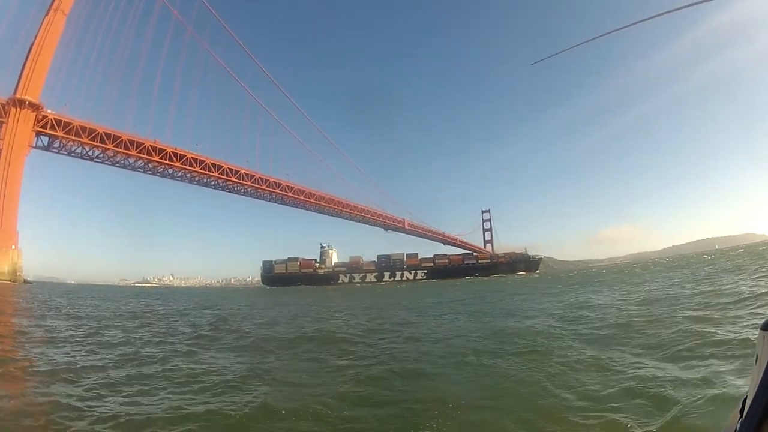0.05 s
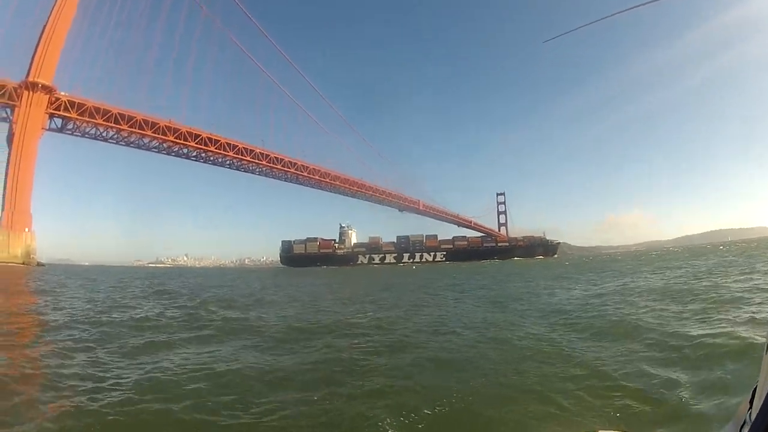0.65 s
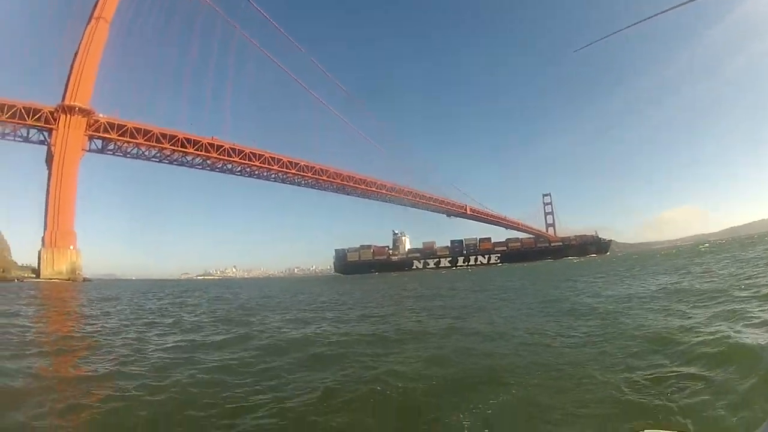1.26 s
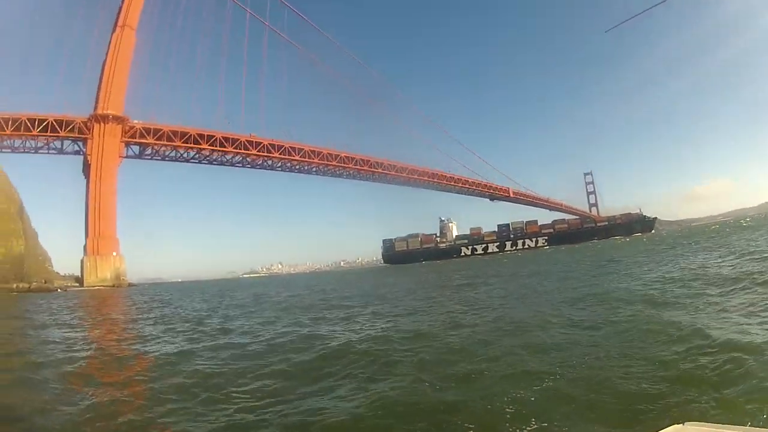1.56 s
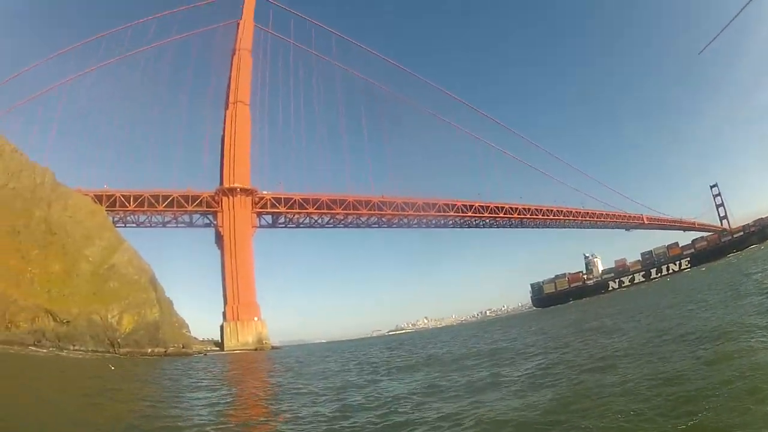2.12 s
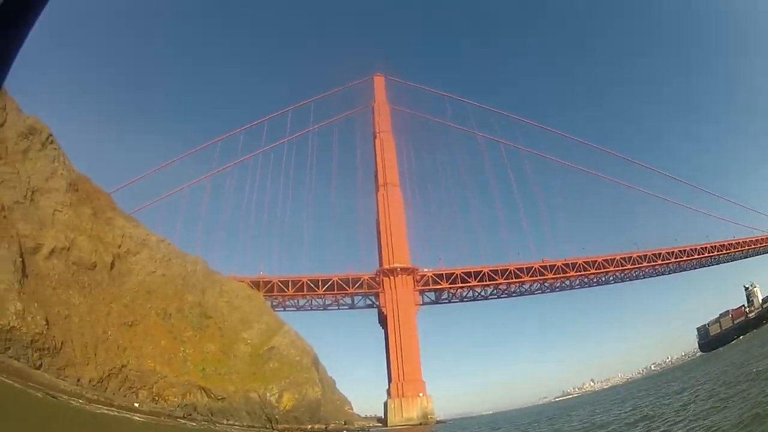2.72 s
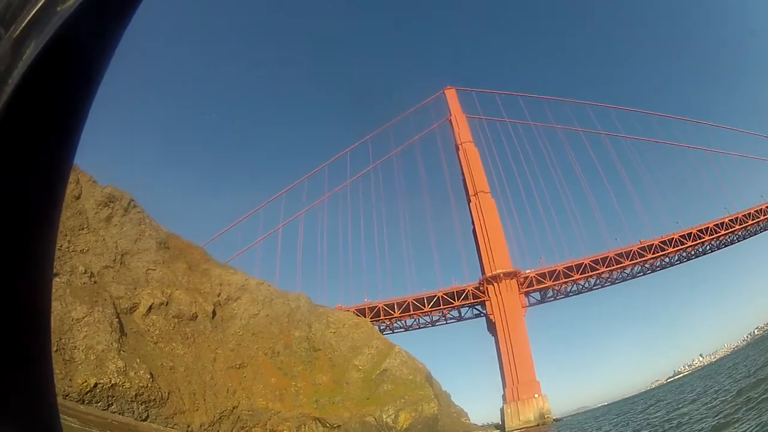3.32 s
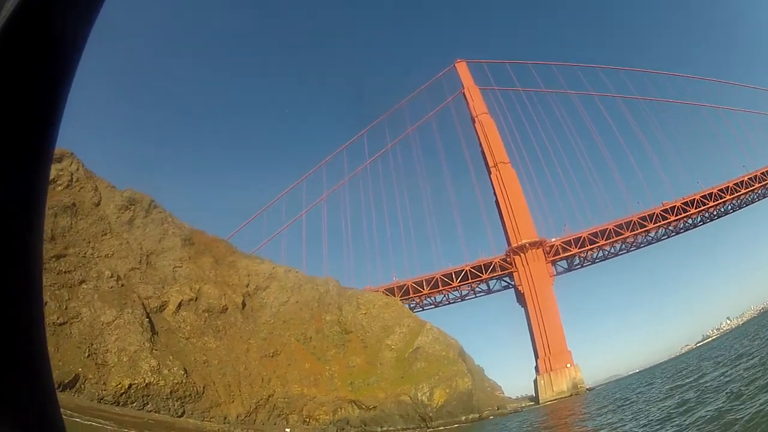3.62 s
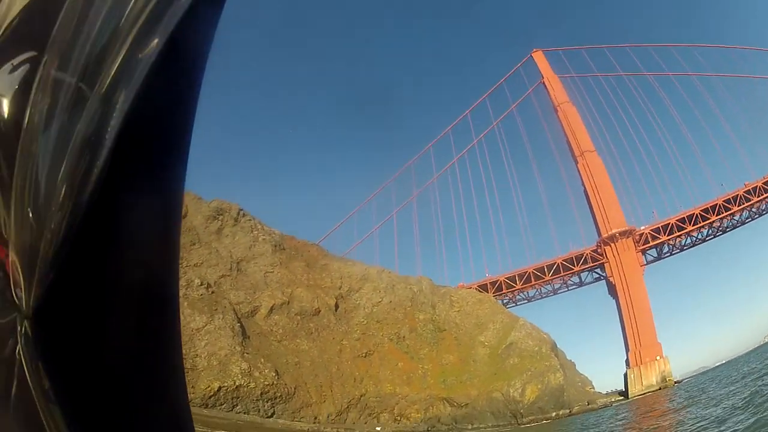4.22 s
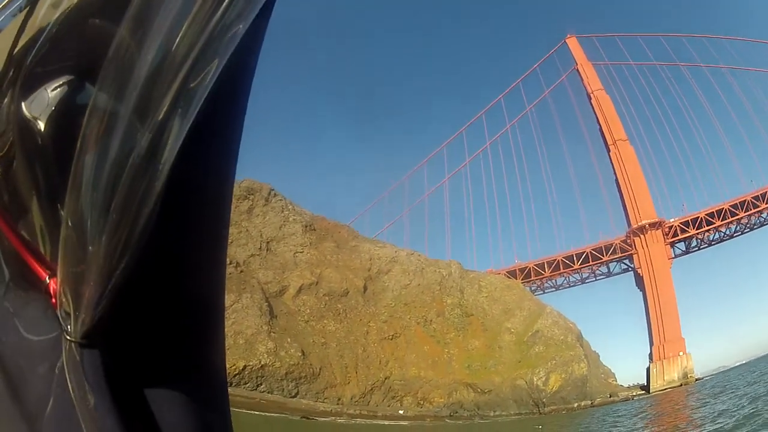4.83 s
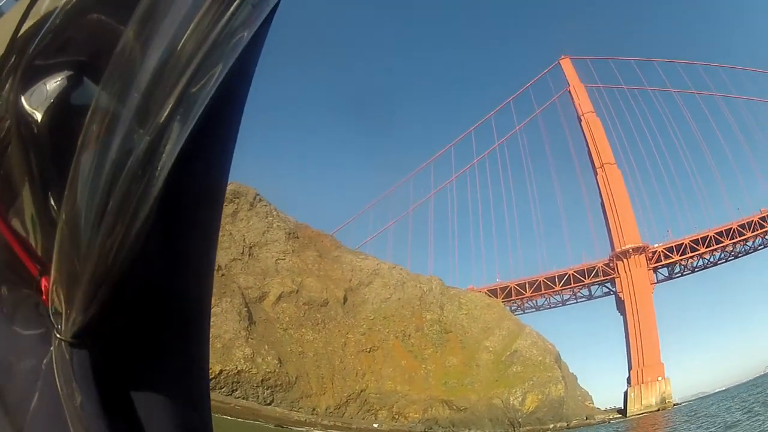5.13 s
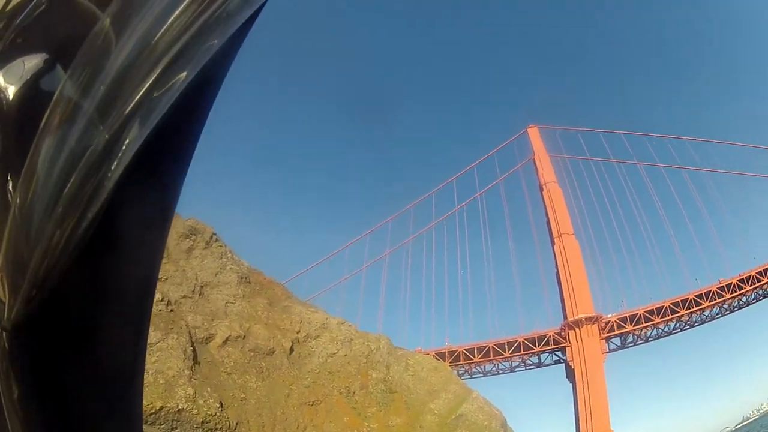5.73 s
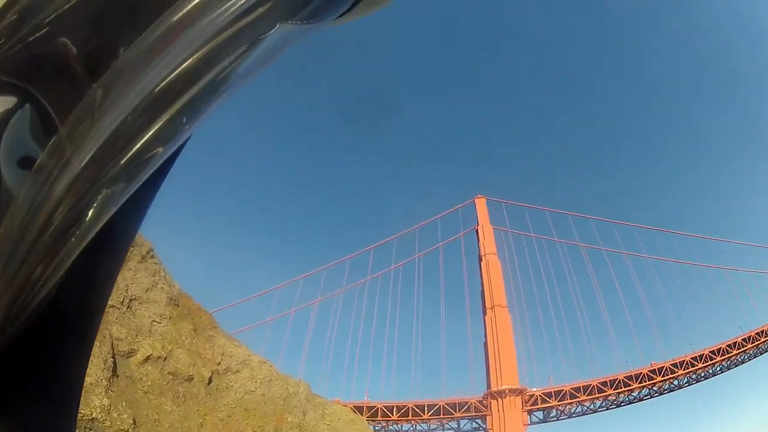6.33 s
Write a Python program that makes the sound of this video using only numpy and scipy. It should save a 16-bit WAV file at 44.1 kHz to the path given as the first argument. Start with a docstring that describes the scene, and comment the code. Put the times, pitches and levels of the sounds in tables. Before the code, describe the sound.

A motorboat rumbles through choppy water, two big waves slamming and booming against the hull amid pattering spray, all muffled and boxy.

```python
"""A motorboat runs through chop, heard from a small camera whose closed waterproof case makes all boxy.
From the start, wind and water hiss faintly while engine, chop and low swells make the hull rumble.
Spray patters and small waves thud; near 1.3 s a big wave slams in with a crack, and its push sets
the hull panels booming in their normal modes. A second big wave strikes near 3.5 s.
After it the thuds die out, leaving the rumble, the hiss, light slaps and sweeps of spray."""
import sys
import numpy as np
from scipy import signal
from scipy.fft import rfft, irfft
from scipy.io import wavfile
from scipy.ndimage import uniform_filter1d

SR = 44100
rng = np.random.default_rng(int(sys.argv[2]) if len(sys.argv) > 2 else 0)


def file_out(sig):
    """Save sig as 16-bit WAV at sys.argv[1]."""
    # one column per channel
    cols = np.atleast_2d(sig).T
    # limit, then scale
    lim = np.clip(cols, -1, 1)
    pcm = np.round(lim * 32767).astype(np.int16)
    wavfile.write(sys.argv[1], SR, pcm)


N = 289296
TIME = np.arange(N) / SR


def from_db(db):
    """Amplitude ratio: tenfold for every 20 dB."""
    return 10 ** (np.asarray(db) / 20)


def rms_one(x):
    """Normalisation to unit mean power."""
    return x / np.sqrt(np.mean(x ** 2) + 1e-20)


def evened(x, span_s):
    """Division by the running rms removes level swings slower than span_s."""
    return x / np.sqrt(np.abs(uniform_filter1d(x ** 2, max(int(span_s * SR), 2))) + 1e-20)


def in_time(rows):
    """Linear interpolation of (time, value) rows at every sample."""
    return np.interp(TIME, *np.transpose(rows))


def wander(per_s):
    """Slow random modulation with per_s turns a second; spread about 1."""
    turns = rng.standard_normal(int(per_s * N / SR) + 2)
    return np.interp(TIME * per_s, np.arange(len(turns)), turns)


def wavering(hz, spread_hz, per_s, flutter_db):
    """A randomly driven resonance wanders in frequency and amplitude; rms about 1."""
    pitch = hz + spread_hz * wander(per_s)
    return np.sqrt(2) * np.sin(2 * np.pi * np.cumsum(pitch) / SR) * from_db(flutter_db * wander(per_s))


def drops(per_s, spread_db):
    """Shot noise: independent impacts of water, with log-normal sizes."""
    hits = rng.random(N) < per_s / SR
    return hits * rng.choice([-1, 1], N) * from_db(spread_db * rng.standard_normal(N))


def surges(rows):
    """Incoherent surges add in power; each has a Gaussian rise and an exponential decay."""
    power = np.zeros(N)
    for s, db, rise, fall in rows:
        near = slice(*np.searchsorted(TIME, [s - 4 * rise, s + 8 * fall]))
        t = TIME[near] - s
        power[near] += (from_db(db) * np.exp(-np.where(t < 0, (t / rise) ** 2, t / fall))) ** 2
    return np.sqrt(power)


# resonances and dips of the case and its mount: (frequency [Hz], width [Hz], gain at coupling 1 [dB])
CASE_RESONANCES = [(124.6, 14.7, 10.5), (158.3, 7.7, 7), (283, 70, 3), (453, 63, 4.5), (536, 150, -0.5),
                   (662, 157, 10.5), (884, 103, 3.5), (1062.4, 170, 9.5), (1240, 89, 6.5), (1469, 84, 3.5),
                   (1534, 37, -8), (1812, 260, 10), (2015, 99, 5.5), (2172, 68, 5.5), (2452, 280, 8.5),
                   (3037, 200, 8), (3683, 200, 8.5)]
def through_case(x, spectrum, coupling=0.96, size=16384):
    """Source and filter: the case resonances colour a spectrum, more deeply the firmer the coupling."""
    hz = np.maximum(np.arange(size // 2 + 1) * SR / size, 1)
    source_hz, source_db = np.transpose(spectrum)
    case_db = sum(gain / (1 + (2 * (hz - centre) / width) ** 2) for centre, width, gain in CASE_RESONANCES)
    db = np.interp(np.log(hz), np.log(source_hz), source_db) + coupling * case_db
    cepstrum = irfft(np.log(from_db(db)))[:size // 2]
    cepstrum[1:] *= 2   # minimum phase: nothing rings before it is struck
    response = irfft(np.exp(rfft(cepstrum, size)))[:size // 2]
    return signal.fftconvolve(x, response)[:len(x)]


# spectrum of wind and running water: (frequency [Hz], relative level [dB])
HISS_SPECTRUM = [(100, 17.5), (350, 6.5), (560, -0.5), (1000, -1.5), (1450, -2.5), (2200, -0.5),
                 (2900, -7.5), (4000, -7.5), (5500, -11.5)]
def wind_and_water(level_db=-55, wander_db=1.74):
    """Broadband noise of wind and running water: a faint, nearly steady hiss."""
    hiss = rms_one(through_case(rng.standard_normal(N), HISS_SPECTRUM))
    return from_db(level_db - wander_db * wander(per_s=8.9)) * hiss


# pitch of the boat's deep sway: (time [s], frequency [Hz])
SWAY_PITCH = [(0.45, 38.45), (0.7, 31.36)]
# strength of the sway: (time [s], relative level [dB])
SWAY_LEVEL = [(0, -36), (.42, -41), (.6, -45), (1.28, -55), (1.37, -25), (1.62, -47), (3.3, -43),
              (3.45, -33), (4.15, -44), (4.27, -63), (4.45, -47.5), (4.98, -64), (5.08, -46.5),
              (5.42, -38.5), (5.55, -50.5), (6.56, -47)]
def deep_sway(gain_db=-2):
    """A low resonance of the boat, sustained by the shaking of engine and chop."""
    tone = wavering(in_time(SWAY_PITCH), spread_hz=3.4, per_s=17, flutter_db=2.5)
    return from_db(gain_db + in_time(SWAY_LEVEL)) * tone


# how hard the chop shakes the boat: (time [s], relative level [dB])
SHAKING = [(0, -34.5), (.2, -43.5), (.43, -34.5), (.6, -48.5), (.82, -46), (.92, -40), (1.68, -34),
           (1.88, -49), (2.3, -46.5), (2.8, -55.5), (3.3, -52), (4.0, -46.5), (4.13, -29.5), (4.32, -48),
           (4.67, -42.5), (5.03, -54.5), (5.4, -44), (5.6, -58), (6.56, -56)]
# spectrum of the broad rumble: (frequency [Hz], relative level [dB])
RUMBLE_SPECTRUM = [(15, -17), (25, 1), (45, -3), (70, -1), (100, -0.5), (128, -2.5), (165, -2), (200, -7),
                   (260, -12), (340, -20), (500, -32.5), (900, -54)]
def hull_rumble(churn, panel_hz=89.55, drone_gain_db=-2, rumble_db=-49):
    """Forced vibration: engine and chop drive a droning panel and a broad rumble, which churn raises."""
    shake_db = in_time(SHAKING)
    panel = wavering(panel_hz, spread_hz=3.87, per_s=21, flutter_db=3.0)
    drone = from_db(drone_gain_db + shake_db) * panel
    steady = from_db(rumble_db + 0.32 * (shake_db - shake_db.mean()))   # follows the shaking in part
    noise = evened(through_case(rng.standard_normal(N), RUMBLE_SPECTRUM), span_s=0.11)
    return drone + np.hypot(steady, churn) * noise


# low swells rolling under the hull without a splash: (peak time [s], level [dB])
SWELLS = [(0.191, -36), (0.391, -33.5), (0.53, -35.5), (1.16, -28.5), (2.44, -36), (2.75, -40.5),
          (2.91, -41.5), (3.07, -47.5), (3.95, -35), (4.342, -42), (5.32, -47), (5.48, -55), (5.66, -41.5),
          (5.83, -51)]
# spectrum of a swell: (frequency [Hz], relative level [dB])
SWELL_SPECTRUM = [(40, -11.5), (90, -6), (128, -0.5), (165, -4.5), (210, -20), (330, -30), (900, -60)]
SWELL_RISE_S, SWELL_FALL_S = 0.028, 0.05
def swell_grumble():
    """Amplitude-modulated low noise: the hull grumbles as each swell passes beneath it."""
    envelope = surges([(s, db, SWELL_RISE_S, SWELL_FALL_S) for s, db in SWELLS])
    return envelope * evened(through_case(rng.standard_normal(N), SWELL_SPECTRUM), span_s=0.0406)


def swell_churn(level_db=-45.5):
    """Envelope of the churn: every swell, big or small, adds the same power to the broad rumble."""
    return surges([(s, level_db, SWELL_RISE_S, SWELL_FALL_S) for s, _ in SWELLS])


# sheets of spray: (peak time [s], level [dB], rise [s], fall [s])
SPRAY_SHEETS = [(0.543, -47, 0.033, .013), (0.635, -53, 0.051, 0.037), (1.38, -42.5, 0.0089, 0.023),
                (1.477, -44, .004, 0.0025), (2.035, -54.5, 0.012, 0.046), (3.212, -48, 0.02, .03),
                (3.42, -47, 0.0076, 0.03), (3.49, -52.5, .01, 0.068), (3.584, -43.5, 0.0071, .014),
                (3.73, -53, 0.027, 0.052), (3.835, -45.5, 0.067, 0.055), (3.92, -55.5, 0.037, 0.05),
                (4.075, -43, 0.081, 0.028), (4.25, -61.5, 0.11, 0.81), (6.239, -43.5, 0.0089, 0.0098),
                (6.42, -59, .11, 0.36), (6.555, -46, 0.03, 0.013)]
# spectrum of spray: (frequency [Hz], relative level [dB])
SPRAY_SPECTRUM = [(100, -9), (300, -2.5), (560, -9), (1000, -12), (1500, -2.5), (1850, -1.5), (2400, -0.5),
                  (2800, -19), (3700, -14), (5500, -24)]
def spray():
    """Shot noise: thousands of uneven drops a second merge into a fine patter."""
    patter = through_case(drops(per_s=5000, spread_db=4), SPRAY_SPECTRUM, coupling=1.1)
    return evened(patter, span_s=0.077) * surges(SPRAY_SHEETS)


# solid water surging along the hull: (peak time [s], level [dB], rise [s], fall [s])
WATER_SURGES = [(0.63, -38.5, .054, 0.042), (1.125, -33, 0.013, 0.048), (1.237, -26, 0.028, 0.027),
                (1.385, -30, 0.036, 0.046), (1.455, -35.5, 0.012, 0.019), (1.669, -30.5, 0.0053, 0.012),
                (1.685, -27.5, 0.034, 0.025), (2.05, -48.5, 0.041, 0.066), (2.286, -38, .007, 0.044),
                (2.322, -37, 0.012, 0.026), (2.57, -43, 0.0048, 0.018), (3.425, -23, 0.012, 0.0068),
                (3.50, -37, 0.014, 0.013), (3.585, -26.5, 0.031, 0.02), (3.85, -40, 0.032, 0.042),
                (4.075, -36, 0.052, 0.024), (4.15, -50.5, 0.0035, 0.15)]
# spectrum of a thud: (frequency [Hz], relative level [dB])
THUD_SPECTRUM = [(20, -22), (60, -3), (90, -1), (140, -1), (200, -9.5), (400, -14.5), (560, -30.5),
                 (850, -31), (1100, -30.5), (1400, -39), (3000, -61), (5500, -89)]
def water_thuds():
    """Structure-borne sound: water striking the hull couples firmly to the case and thuds hollowly."""
    thuds = through_case(drops(per_s=3000, spread_db=0), THUD_SPECTRUM, coupling=1.75)
    return evened(thuds, span_s=0.023) * surges(WATER_SURGES)


def flattened(burst):
    """Spectral whitening: the same phases and energy, shared evenly among all frequencies."""
    spectrum = rfft(burst)
    return irfft(spectrum / (np.abs(spectrum) + 1e-12), len(burst)) * np.sqrt(np.sum(burst ** 2))


# waves slamming the hull, each with a crack and a push:
# (time [s], push level [dB], push delay [s], crack level [dB], crack length [s], treble shelf [dB])
WAVE_SLAMS = [(0.865, -17.5, 0.0099, -44.5, 0.012, 1.5), (1.112, -25, 0.0023, -57, 0.0093, -9),
              (1.227, -24, 0.014, -51, 0.0076, -28), (1.3365, -4.5, 0.0038, -18, 0.0094, -11.5),
              (2.275, -53, 0.0026, -51.5, 0.011, -10), (2.316, -30, 0.0021, -39, 0.0028, -25),
              (2.412, -55, 0.003, -49.5, 0.007, -12), (2.532, -41, 0.0064, -40, 0.0037, -16),
              (3.3, -25.5, 0.0048, -65, 0.0082, -10), (3.412, -11, 0.0023, -28, 0.0069, -15.5),
              (3.468, -10, 0.0076, -17.5, 0.01, 0), (3.5506, -1, 0.01, -20, 0.015, -3),
              (4.532, -50, .003, -46.5, 0.0048, -10), (6.229, -45, 0.0032, -51, 0.021, 0.5)]
# spectrum of a crack: (frequency [Hz], relative level [dB])
CRACK_SPECTRUM = [(100, 7.5), (250, 5.5), (600, -4), (1100, -4.5), (1500, 2), (1850, 1.5), (2300, -0.5),
                  (3000, -26.5), (3700, -18.5), (5500, -30)]
def hull_cracks(size=4096, tail_db=-9, tail_s=0.011, tail_hz=1300, shelf_hz=1300):
    """Impact noise: water closing on the hull rattles the case in a burst that leaves a duller tail."""
    out, t = np.zeros(N + size), np.arange(size) / SR
    low_pass = signal.butter(2, tail_hz, fs=SR, output="sos")
    for s, _, _, db, length, shelf_db in WAVE_SLAMS:
        contacts = rng.choice([-1, 1], size)
        arch = np.sin(np.pi * np.minimum(t / length, 1))
        burst = flattened(contacts * arch ** 0.26) * arch ** .5
        tail = contacts * (t > length) * from_db(tail_db) * np.exp(-np.abs(t - length) / tail_s)
        # flat landings are brighter
        spectrum = [(hz, level + shelf_db * (hz > shelf_hz)) for hz, level in CRACK_SPECTRUM]
        crack = through_case(burst + signal.sosfilt(low_pass, tail), spectrum, coupling=1.23)
        at = int(s * SR)
        out[at:at + size] += from_db(db) * crack / np.sqrt(np.sum(crack ** 2) / (length * SR))
    return out[:N]


def ring(force, hz, t60):
    """Velocity of a damped oscillator: a unit impulse starts a decaying cosine of height 1."""
    radius, angle = from_db(-60 / (t60 * SR)), 2 * np.pi * hz / SR
    return signal.lfilter([1, -1], [1, -2 * radius * np.cos(angle), radius * radius], force + 1e-18)


# normal modes of the hull panels: (frequency [Hz], gain [dB], time to decay by 60 dB [s])
HULL_MODES = [(32.2, -23.5, 0.77), (86.7, -12, 1), (111.2, -1, 0.13), (133.4, -2, 0.14), (243, -28, .08),
              (276, -24, 0.11), (350, -3.5, 0.59), (475, -23, 0.051)]
def hull_booms(push_s=0.0069):
    """Modal superposition: each slam is a half-sine force pulse that leaves the panels ringing."""
    force = np.zeros(N)
    for s, push_db, delay, *_ in WAVE_SLAMS:
        push = np.sin(np.pi * np.clip((TIME - s - delay) / push_s + .5, 0, 1))
        force -= from_db(push_db) * push / push.sum()
    return sum(from_db(db) * ring(force, hz, t60) for hz, db, t60 in HULL_MODES)


# gusts of a thin high hiss: (peak time [s], level [dB], rise [s], fall [s])
GUSTS = [(1.14, -71, 0.053, .1), (4.33, -70, 0.0098, 0.031), (5.40, -66.5, .008, 0.11),
         (5.62, -67, 0.036, .16), (6.46, -80, 0.069, 0.082)]
def thin_gusts(band_hz=(2690, 6400)):
    """Band-limited noise: a thin hiss that rises and fades in gusts."""
    band_pass = signal.butter(2, band_hz, "band", fs=SR, output="sos")
    return surges(GUSTS) * rms_one(signal.sosfilt(band_pass, rng.standard_normal(N)))


def scene():
    """Superposition: all sources add at one microphone inside the case."""
    impacts = hull_cracks() + hull_booms() + water_thuds() + spray()
    vibration = deep_sway() + hull_rumble(swell_churn()) + swell_grumble()
    return (impacts + vibration + wind_and_water() + thin_gusts())[None]


def record(dry, band_hz=5450, hold_hz=12000, mirror_db=-0.5, cutoff_hz=15300):
    """Spectral imaging: the camera holds each sample, mirroring its narrow band about the hold rate."""
    band = signal.sosfilt(signal.cheby1(8, .2, band_hz, fs=SR, output="sos"), dry)
    steps = np.diff(band, prepend=0) * 2 * np.cos(2 * np.pi * hold_hz * TIME)
    mirror = signal.lfilter([1], [1, -.95], steps)   # leaky integration
    top_cut = signal.ellip(10, .2, 80, cutoff_hz, fs=SR, output="sos")
    return signal.sosfilt(top_cut, band + from_db(mirror_db) * mirror)


dry = scene()
out = record(dry)
file_out(out)
```